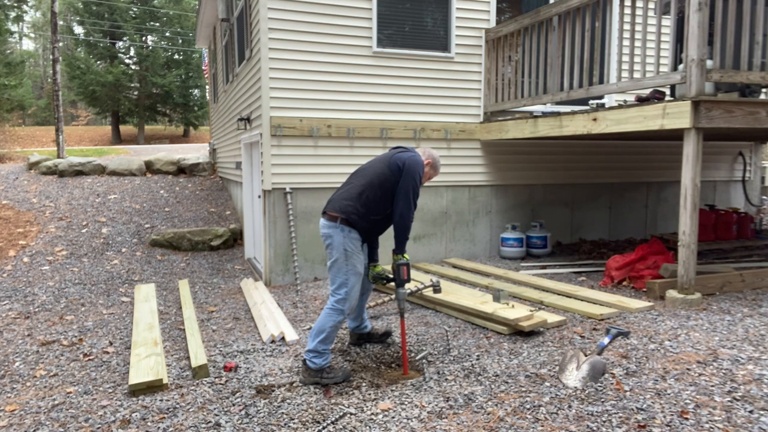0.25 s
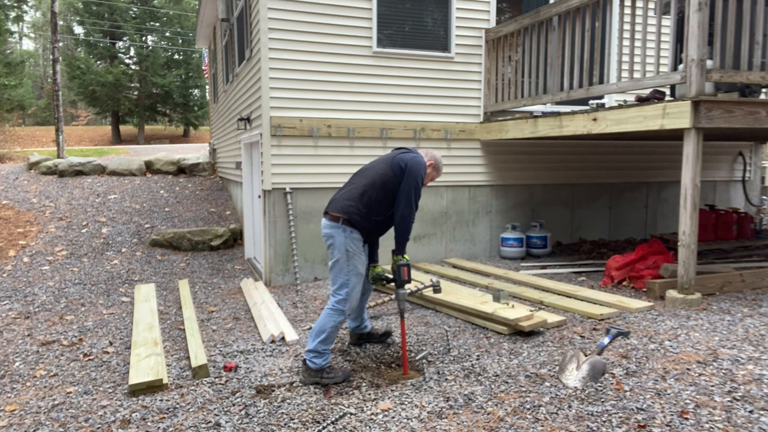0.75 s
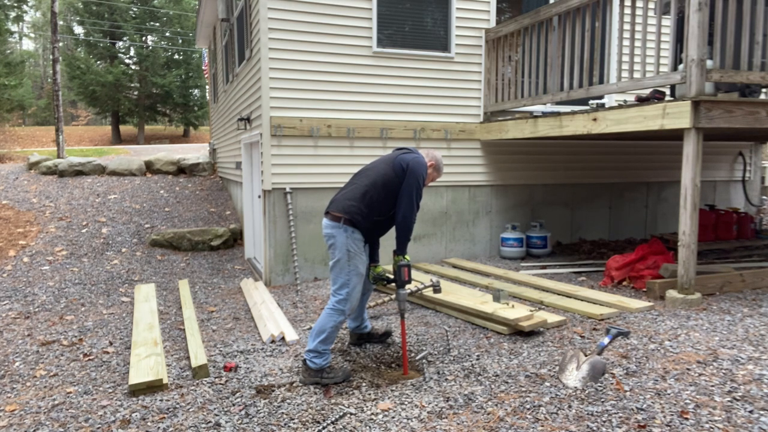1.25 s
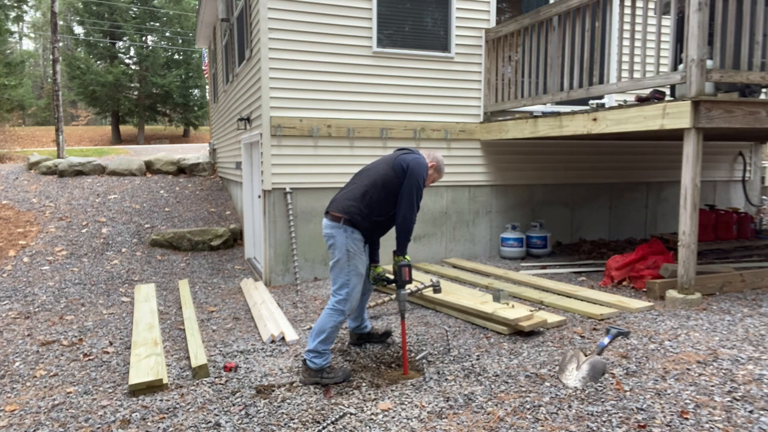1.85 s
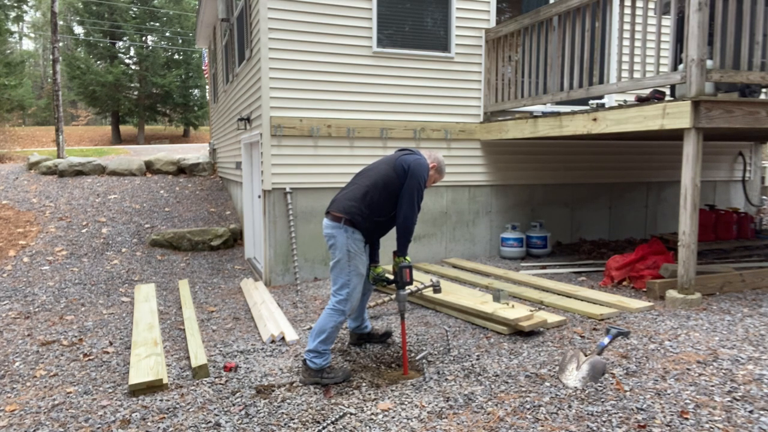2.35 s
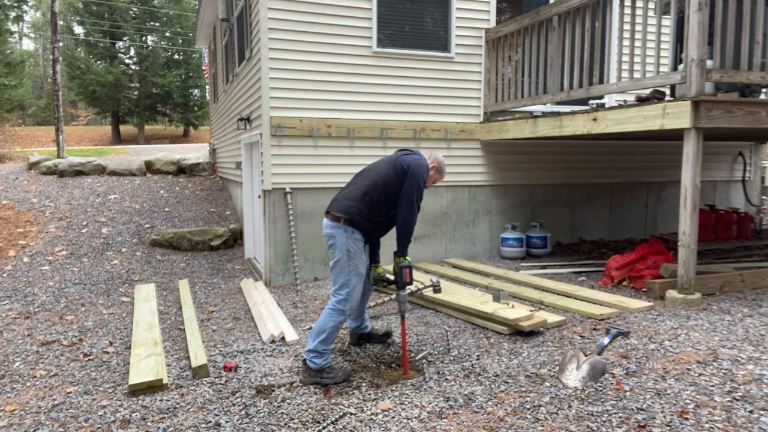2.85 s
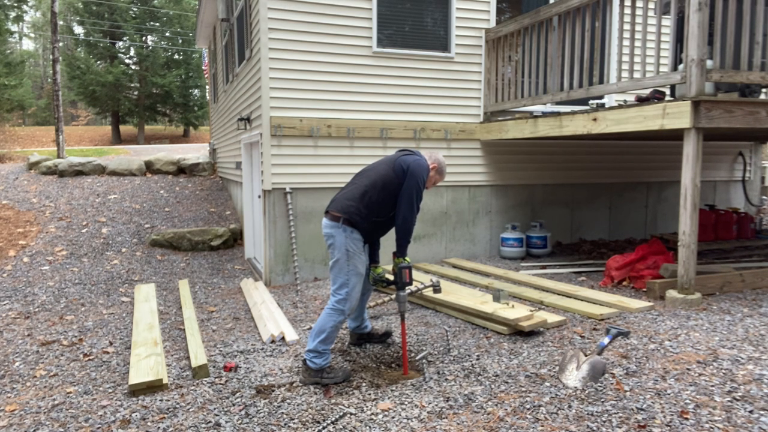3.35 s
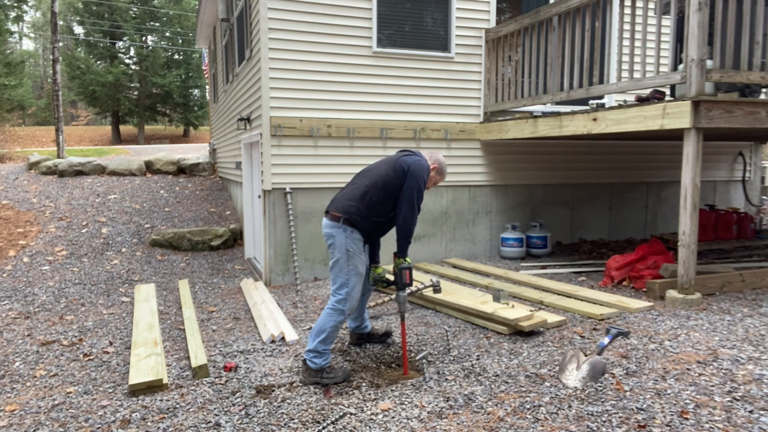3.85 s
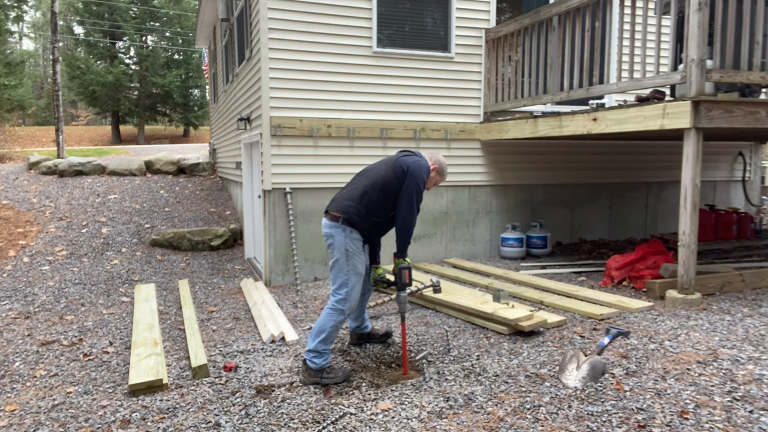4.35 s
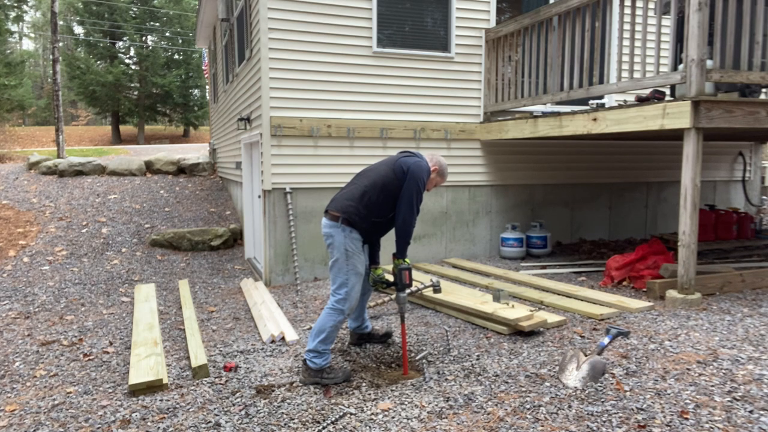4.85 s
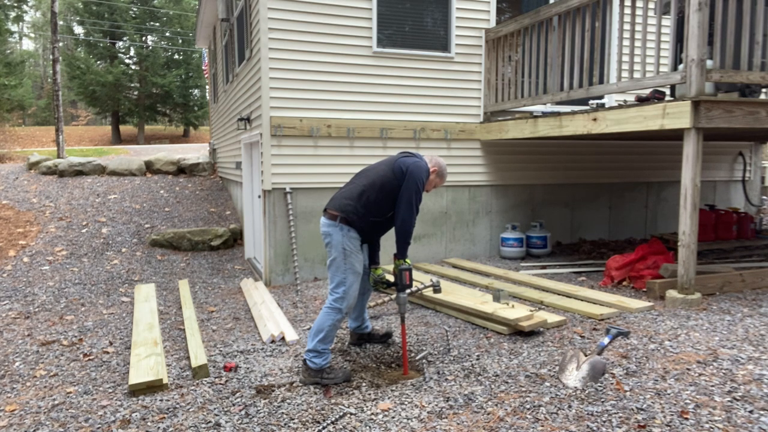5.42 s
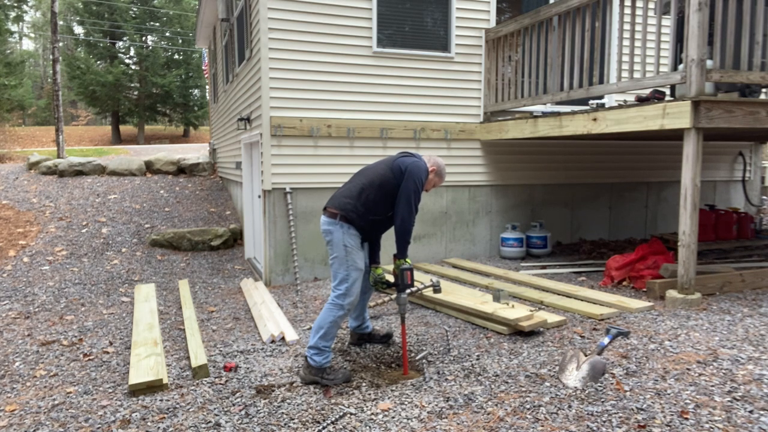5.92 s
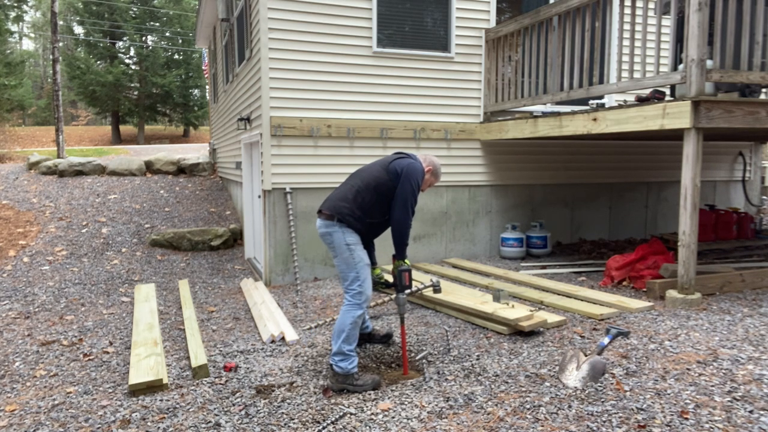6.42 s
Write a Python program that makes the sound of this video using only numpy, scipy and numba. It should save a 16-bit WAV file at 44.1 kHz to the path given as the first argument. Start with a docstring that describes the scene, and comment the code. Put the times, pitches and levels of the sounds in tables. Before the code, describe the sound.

Outdoors beside a house, a power hammer drives a steel rod into gravelly ground some metres from a phone. Rapid, hard metallic blows blur into a rattling buzz, with chattering loose parts, grainy motor hiss and a low thud. The tone shifts as the rod slowly turns. Near the end the trigger is released, the striker bounces irregularly, and a short echo fades.

```python
"""Yard beside a house: a rotary hammer drives a long steel rod into gravel, some metres from a phone.
About 35 blows a second ring decaying modes of rod and housing; loose parts chatter between blows.
The ground thuds in multiples of the stroke rate, the motor is grainy coloured noise, and the slowly
turning rod changes which rings are heard. The trigger is released, the striker bounces out, the yard echoes."""
import sys
import numpy as np
from scipy import signal
from scipy.fft import rfft, irfft, next_fast_len
from scipy.io import wavfile
from numba import njit

SR = 44100
rng = np.random.default_rng(int(sys.argv[2]) if len(sys.argv) > 2 else 0)


def undo_db(level):
    """Turn decibels back into plain size, where 20 dB means ten times bigger."""
    steps = np.asarray(level, float) / 20
    return 10 ** steps


def log_audio(samples):
    """Write samples as a 16-bit WAV file to the path given in sys.argv[1]."""
    # one column per channel
    frames = np.atleast_2d(samples).T
    # limit to full scale, then quantise
    limited = np.clip(frames, -1, 1)
    pcm = np.round(limited * 32767).astype(np.int16)
    wavfile.write(sys.argv[1], SR, pcm)


N = 294571

# start of each half turn of the rod, which runs freely, then binds and slows: (time [s])
HALF_TURN_S = [-.0292, .3703, .8345, 1.3153, 1.6362, 2.1496, 2.5279, 2.9807, 3.4485, 3.7895, 4.2859, 4.5411,
               5.0371, 5.3789, 5.8166, 6.1888]


def level(x, db):
    """Scale to an rms level."""
    return x * undo_db(db) / np.sqrt(np.mean(x ** 2))


def colour(x, spectrum):
    """Weight by (frequency [Hz], level [dB]) points joined on a log-frequency axis."""
    hz, db = np.transpose(spectrum)
    size = x.shape[-1]
    f = np.arange(1, size // 2 + 2) * SR / size
    weight = undo_db(np.interp(np.log(f), np.log(hz), db))
    return irfft(rfft(x) * weight, size)


def walk(rate_hz, count):
    """Random levels joined by straight lines, rate_hz new ones a second."""
    knots = rng.standard_normal((count, int(N / SR * rate_hz) + 2))
    position = np.arange(N) / SR * rate_hz
    return np.array([np.interp(position, np.arange(len(k)), k) for k in knots])


@njit
def decay(size, start, turn, fall, rise, gain, floor):
    """Damped rotations, each swelling over the contact time and running until it is faint."""
    out = np.zeros(size)
    for k in range(len(start)):
        z = gain[k]
        step = fall[k] * np.exp(1j * turn[k])
        i = start[k]
        unrisen = 1.
        remaining = 1.
        while remaining > floor and i < size:
            unrisen *= rise
            if i >= 0:
                out[i] += z.imag * (1 - unrisen)
            z *= step
            remaining *= fall[k]
            i += 1
    return out


def ring(modes, s, db, scatter_db=1.79, detune=0.00714, contact_ms=0.14):
    """Strike a set of modes; each blow lands differently, so sizes, phases and pitches scatter."""
    hz, mode_db, t60_s = np.transpose(modes)
    chance = rng.standard_normal((len(s), 3, len(hz)))
    size_db = db[:, None] + mode_db + scatter_db * chance[:, 0]
    gain = undo_db(size_db) * np.exp(1j * np.pi * chance[:, 1])
    turn = 2 * np.pi * hz * (1 + detune * chance[:, 2]) / SR
    fall = np.exp(-np.log(1000) / (t60_s * SR)) + 0 * turn
    start = np.repeat(np.round(s * SR).astype(np.int64), len(hz))
    rise = np.exp(-1000 / (contact_ms * SR))
    return decay(N, start, turn.ravel(), fall.ravel(), rise, gain.ravel(), 1 / 500)


def strokes():
    """Time [s] of every stroke, and the turns the rod has made by then."""
    # blows struck by the start of each half turn: (count)
    blows_so_far = [0, 14, 30, 47, 58, 76, 89, 105, 121, 133, 150, 159, 176, 188, 203, 216]
    count = np.arange(blows_so_far[-1] + 1)
    s = np.interp(count, blows_so_far, HALF_TURN_S)
    turns = np.interp(count, blows_so_far, np.arange(len(blows_so_far)) / 2)
    return s, turns


def stroke_levels():
    """Levels of every stroke follow the angle of the rod and the slow lean of the tool."""
    # heard from this side at even steps round one turn: (bending rings [dB], low rings [dB],
    # middle ring [dB], high rings [dB], housing [dB], shell [dB], ground thud [dB])
    round_turn = [(-21.5, -20, -27.5, -20.5, -34.5, -33.5, -55), (-22, -20.5, -28, -20, -34.5, -33, -51.5),
                  (-26.5, -23, -26, -22, -33, -34, -50), (-29.5, -21.5, -29.5, -21.5, -32.5, -34, -57.5),
                  (-23, -28, -36, -21.5, -32.5, -34.5, -56), (-23, -25, -33.5, -21.5, -32, -32.5, -64),
                  (-26, -25, -32, -22, -33.5, -32.5, -68), (-25, -26, -31.5, -23, -32.5, -31.5, -67.5)]
    # drift as the tool is leant on: (time [s], shell [dB], ground thud [dB])
    lean = [(0, -.6, 13), (.4, -4, 7), (.8, 0, 9), (1.2, -3, 3), (1.45, .6, -1.5), (1.9, 1.9, -4),
            (2.2, 7.5, -7), (2.35, 5, -19), (2.6, 2.6, -14), (2.83, 0, 7), (3.2, -1.8, 0), (3.6, -3, 3),
            (4.1, -3.6, 5), (4.5, 2.1, -8), (4.85, 4, -3), (5.2, -1.7, -1.2), (5.7, -1.1, -1.5),
            (5.82, -.4, 10), (6, 2.8, -10)]
    s, turns = strokes()
    angle = np.arange(len(round_turn)) / len(round_turn)
    db = np.array([np.interp(turns, angle, column, period=1) for column in np.transpose(round_turn)])
    lean_s, *drifts = np.transpose(lean)
    shell_drift, thud_drift = [np.interp(s, lean_s, column) for column in drifts]
    db[-2] += shell_drift
    db[-1] += thud_drift
    db[0] += 0.3 * shell_drift  # bending rings follow in part
    return db


def still_air():
    """Steady coloured noise, independent on each side."""
    # air spectrum before levelling: (frequency [Hz], level [dB per Hz])
    air = [(20, -20), (80, 0), (1000, -8), (6000, -14), (9000, -30), (16000, -50)]
    return level(colour(rng.standard_normal((2, N)), air), -79)


def yard(x):
    """Quick echoes off wall and deck, a faint tail from the trees; the shaking tool feeds changing paths."""
    # echo colour: (frequency [Hz], level [dB])
    echo_colour = [(60, -14), (300, -6), (1500, 0), (2800, 3.5), (4000, -3), (6000, -4), (8000, -10),
                   (12000, -9), (16000, -14)]
    near_t60_s, near_db = 0.045, -13.5
    far_t60_s, far_db = 0.66, -20.5
    side_share = 0.57  # echo particular to each side, against the shared one
    t = np.arange(SR * 3 // 4) / SR
    fade = 0
    for t60_s, db in ((near_t60_s, near_db), (far_t60_s, far_db)):
        tail_norm = np.sqrt(t60_s * SR / (2 * np.log(1000)))
        fade = fade + undo_db(db - 60 * t / t60_s) / tail_norm
    onset = np.minimum(t / 0.0022, 1)
    # three paths, each with a shared, a left and a right response
    paths = colour(rng.standard_normal((3, 3, len(t))), echo_colour) * fade * onset
    responses = paths[:, :1] + side_share * paths[:, 1:]
    aim = walk(30, count=3)
    aim = aim / np.sqrt((aim ** 2).sum(axis=0))
    size = next_fast_len(N + len(t))
    heard = rfft(x * aim, size)[:, None] * rfft(responses, size)
    return irfft(heard.sum(axis=0), size)[:, :N]


def ground():
    """The soil is pushed once a stroke: a thud made of multiples of the stroke rate, each wavering a little."""
    # thud by multiple of the stroke rate: (level [dB], share of the thud's swells followed [ratio])
    thud_shape = [(-21, 0.65), (-2.5, 0.5), (-8.5, 0.35), (-13, .8), (-6.5, 0.24), (-14, .5), (-8, 0.19),
                  (-8, 0.25), (-10, 0.19), (-13, .2), (-9, 0.37), (-18.5, 0.39), (-21, 0.45), (-31, .2)]
    lag_ms, fade_s = 11.49, 0.026
    waver_db, waver_rad = 1.7, 0.68
    s, _ = strokes()
    thud_db = stroke_levels()[-1]
    mean_db = np.mean(thud_db)
    t = np.arange(N) / SR
    multiple = np.arange(1, 15)[:, None]
    db, follow = np.transpose(thud_shape)[:, :, None]
    cycles = np.interp(t - lag_ms / 1000, s, np.arange(len(s)))
    fade = np.exp(-np.maximum(t - s[-1], 0) / fade_s)
    swing_db = np.interp(t, s, thud_db - mean_db)
    waver = walk(5, count=len(thud_shape))
    size = undo_db(db + follow * swing_db + waver_db * waver)
    tones = size * np.cos(2 * np.pi * multiple * cycles + waver_rad * waver[::-1])
    return fade * undo_db(mean_db) * tones.sum(axis=0)


def motor():
    """Fan and gear hiss, grainy with small rattles, dying as the brake stops it; partly scattered on its way."""
    # hiss spectrum before levelling: (frequency [Hz], level [dB per Hz])
    hiss_colour = [(60, -52.5), (200, -25.5), (510, -15), (1610, -6), (3050, -10.5), (5420, -5),
                   (7000, -1.5), (8250, -8), (9020, -12.5), (12700, -7), (15500, -12), (16200, -33.5)]
    # hiss through time: (time [s], level [dB])
    hiss_level = [(0, -38.5), (3, -39.5), (6.2, -39), (6.33, -41.5), (6.38, -38.5), (6.42, -56),
                  (6.5, -100)]
    shared, left, right = rng.standard_normal((3, N))
    grain_db = 5 * np.repeat(rng.standard_normal(N // 96 + 1), 96)[:N]
    noise = shared + 2.1 * np.array([left, right])
    hiss = colour(undo_db(grain_db) * noise, hiss_colour)
    return level(hiss, 0) * undo_db(np.interp(np.arange(N) / SR, *np.transpose(hiss_level)))


def hammer():
    """Each stroke is a blow of four quick contacts, then the recoil clacks; free bounces end it."""
    # rod bending modes: (frequency [Hz], level [dB], t60 [s])
    rod_bend = [(3806, -7, 0.021), (4000, -5.5, 0.01), (4260, -5.5, .012), (4600, -7.5, 0.0094)]
    # low rod rings: (frequency [Hz], level [dB], t60 [s])
    rod_low = [(4810, -7, 0.0082), (5335, 0, 0.014), (5568, 9.5, 0.006), (6160, -3, 0.0056)]
    # middle rod rings: (frequency [Hz], level [dB], t60 [s])
    rod_middle = [(6580, -8, .022), (7100, -10, .01), (7800, -4, .012), (8250, 6, .018), (8700, -6, .012)]
    # high rod rings: (frequency [Hz], level [dB], t60 [s])
    rod_high = [(9810, -24, .1), (10380, -13, .03), (12275, -26, .12), (12428, -22, .14), (12600, -20, .05),
                (12720, -21, .06), (13050, -28, .09), (13535, -24, .1), (14140, -15, .07),
                (14860, -23, .07)]
    # brief contact noise: (frequency [Hz], level [dB], t60 [s])
    crack = [(9450, -14, .009), (10100, -7, .015), (10800, -12, .012), (11500, -12, .012),
             (12100, -11, .012), (12600, -9, .015), (13300, -11, .012), (13900, -9, .012),
             (14500, -10, .012), (15100, -10, .012), (15550, -10, .012)]
    # housing modes: (frequency [Hz], level [dB], t60 [s])
    housing = [(460, -24.5, 0.026), (772, -19.5, 0.039), (1000, -11, 0.02), (1209, -9.5, 0.019),
               (1640, 0, 0.011)]
    # shell modes: (frequency [Hz], level [dB], t60 [s])
    shell = [(2128, -8, 0.016), (2448, -5, 0.013), (2833, -12.5, .015), (3230, -8.5, 0.018)]
    # kick of the braked tool: (frequency [Hz], level [dB], t60 [s])
    kick = [(140, -37.5, 0.058), (213, -31.5, 0.06), (303, -41, 0.065)]
    # close pair in the chuck that beats and sings on: (frequency [Hz], level [dB], t60 [s])
    chuck = [(7380, -71, .6), (7414, -71, .6)]
    # pitch scatter from blow to blow, by family: (share of the pitch [ratio])
    detunes = [.006, .008, .009, .0006, .012, .05, .05]
    # contacts in each stroke: (time after the blow [ms], scatter [ms], rod [dB], housing [dB], scatter [dB])
    contacts = [(0, .1, -15, -9.5, 1), (.6, .1, -5, -4, 1), (1.1426, .12, 4, 3, 0.47),
                (2.413, .5, -4.5, 0, 0.5), (16.3, 0.53, -31, -27.5, 7.5), (20.71, .6, -21, -7.5, 5),
                (23.34, 1.5, -20.5, -6.5, 5)]
    # striker bouncing after release: (time [s], rod [dB], housing minus rod [dB])
    bounces = [(6.2202, -12, -21.5), (6.2251, -16, -19), (6.2389, -13, -17), (6.2588, -17.5, -13),
               (6.2702, -17, -14), (6.2874, -18.5, -17), (6.2929, -20, -18), (6.346, -15, -20),
               (6.367, -20, -20), (6.3725, -18.5, -18)]
    # bounce level to each family of modes: (level [dB])
    bounce_rings_db = [-1.5, -8.5, -15.5, -10.5, -6, 4.5, 7.5]
    # force on the rod at the start of each half turn: (level [dB])
    turn_force_db = [.3, .1, .7, .2, -.9, 1.1, .7, 0, .1, -.4, 0, .1, .4, .6, .6, .2]
    # blows that land squarely: (time [s], extra force [dB])
    square_blows = [(.057, 1.5), (.201, 1.5), (.573, 4.2), (.631, 3.3), (.919, 2.5), (.976, 1.9),
                    (1.49, 2.1), (1.549, 2.5), (1.722, 2.9), (1.779, 2.9), (1.922, 2.1), (2.528, 3.1),
                    (2.584, 3.1), (2.839, 3.1), (3.156, 2.6), (3.39, 1.8), (3.448, 3), (3.819, 3),
                    (3.877, 2.5), (4.198, 2.5), (4.228, 2.9), (4.775, 3), (5.008, 2.1), (5.379, 2.4),
                    (5.788, 1.6)]
    # the last blow glances: (bending rings up [dB], low rings up [dB])
    last_blow_db = (7, -6)
    scatter_db, alternate_db = 0.6, 1.2

    s, _ = strokes()
    square_s, square_db = np.transpose(square_blows)
    force_db = np.interp(s, HALF_TURN_S, turn_force_db)
    force_db[np.abs(s - square_s[:, None]).argmin(axis=1)] += square_db
    levels = stroke_levels()[:-1] + scatter_db * rng.standard_normal((len(s), 6)).T
    levels[:2, -1] += last_blow_db
    bend_db, low_db, middle_db, high_db = levels[:4] + force_db
    # strong-weak alternation, slipping its step now and then
    step = np.sign(np.interp(s * SR, np.arange(N), walk(2.5, count=1)[0]))
    housing_db, shell_db = levels[4:] + alternate_db * step * (-1) ** np.arange(len(s))

    lag_ms, spread_ms, rod, case, contact_scatter_db = np.transpose(contacts)
    chance = rng.standard_normal((len(s), 2, len(lag_ms)))
    bounce_s, bounce_db, bounce_case = np.transpose(bounces)
    contact_s = s[:, None] + (lag_ms + spread_ms * chance[:, 0]) / 1000
    when = np.r_[contact_s.ravel(), bounce_s]
    # modes, stroke level, contact levels, extra bounce level (all dB)
    families = (
        (rod_bend, bend_db, rod, 0),
        (rod_low, low_db, rod, 0),
        (rod_middle, middle_db, rod, 0),
        (rod_high, high_db, rod, 0),
        (crack, high_db, rod, 0),
        (housing, housing_db, case, bounce_case),
        (shell, shell_db, case, bounce_case))
    out = 0
    for (modes, db, contact_db, free), free_db, detune in zip(families, bounce_rings_db, detunes):
        blow_db = db[:, None] + contact_db + contact_scatter_db * chance[:, 1]
        all_db = np.r_[blow_db.ravel(), bounce_db + free + free_db]
        out = out + ring(modes, when, all_db, detune=detune)
    # the braked tool kicks in the hands on each free bounce
    out = out + ring(kick, bounce_s, bounce_db, detune=0.11, contact_ms=1.6)
    chuck_s = np.r_[s, bounce_s]
    return out + ring(chuck, chuck_s, np.zeros(len(chuck_s)), detune=0)


def scene():
    """Hammer and motor with their echoes, the ground under them, still air."""
    steel, hiss = hammer(), motor()
    echoes = yard(steel + hiss.mean(axis=0))
    return steel + hiss + echoes + ground() + still_air()


def roll_off(x):
    """The treble ends steeply here."""
    return signal.sosfilt(signal.butter(12, 16470, fs=SR, output="sos"), x)


def record(dry):
    """The phone's ports hear each pitch with their own phase and balance."""
    # phase between the ports: (frequency [Hz], left lead [rad])
    port_phase = [(30, -1.7), (200, -2.6), (290, -2), (550, -1.2), (600, -.3), (1460, -.2), (2840, -1.1),
                  (4570, -1.2), (6030, -2.4), (6700, -2.7), (6800, -1.2), (7100, .1), (9470, .2),
                  (10900, .8), (14000, 2.7), (16000, 3.3)]
    # balance between the ports: (frequency [Hz], left minus right [dB])
    port_balance = [(100, 0), (250, -1), (700, -.5), (2400, 0), (6000, 0), (7000, -4), (8000, -1.5),
                    (9000, 0)]
    size = next_fast_len(N + SR // 10, real=True)
    f = np.arange(size // 2 + 1) * SR / size
    side = np.array([[.5], [-.5]])  # half the difference to each port
    phase = np.exp(1j * side * np.interp(f, *np.transpose(port_phase)))
    balance = undo_db(side * np.interp(f, *np.transpose(port_balance)))
    mix = irfft(rfft(dry, size) * phase * balance, size)[:, :N]
    return roll_off(mix)


dry = scene()
out = record(dry)
log_audio(out)
```